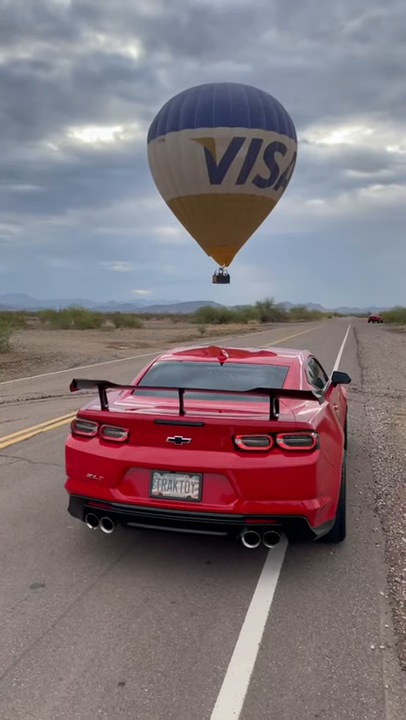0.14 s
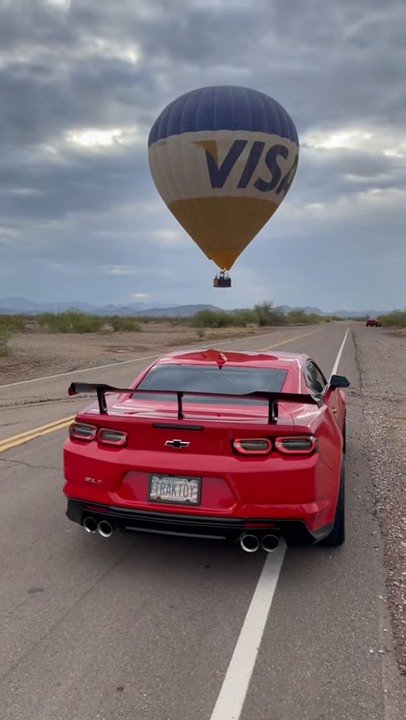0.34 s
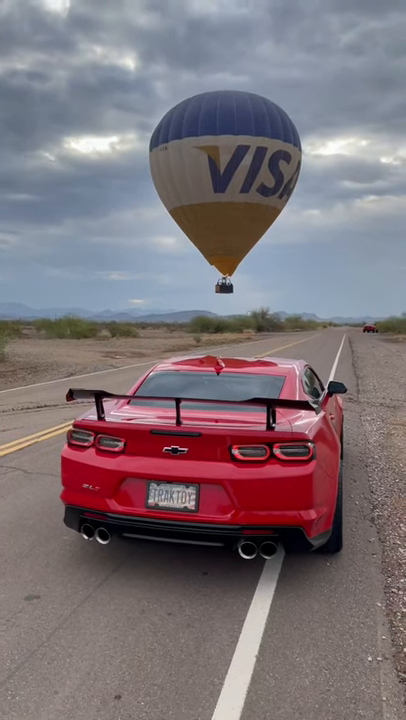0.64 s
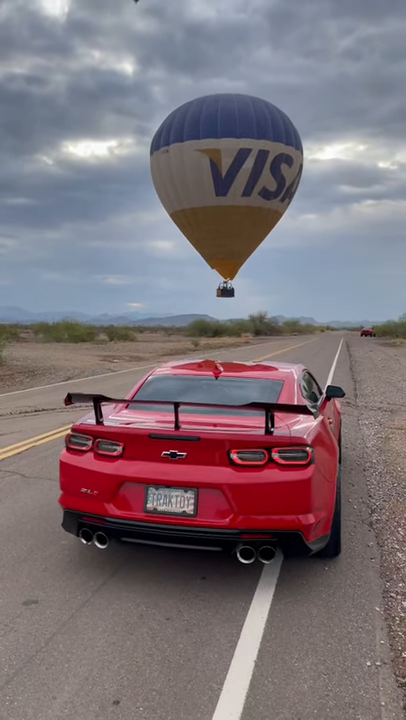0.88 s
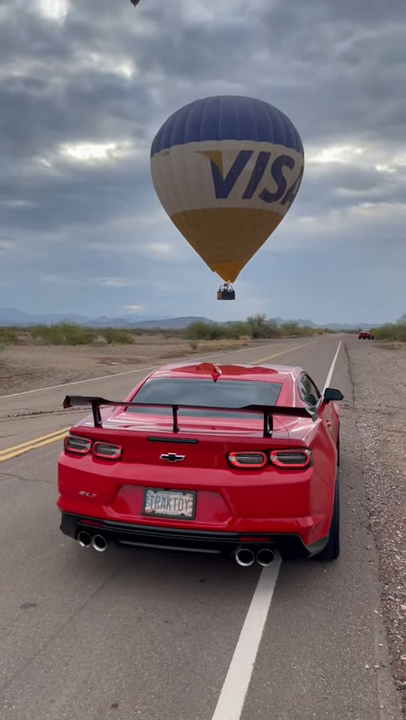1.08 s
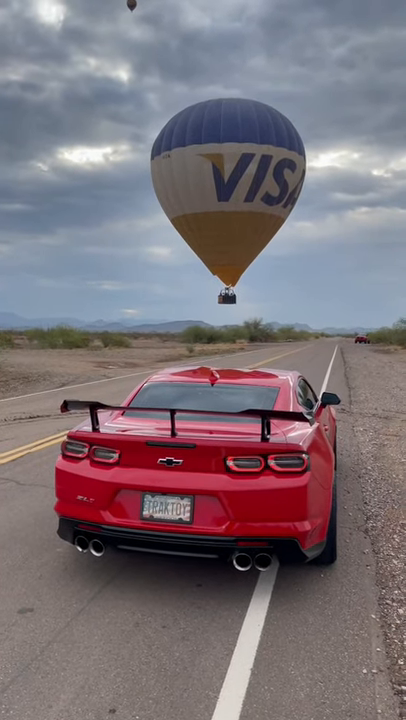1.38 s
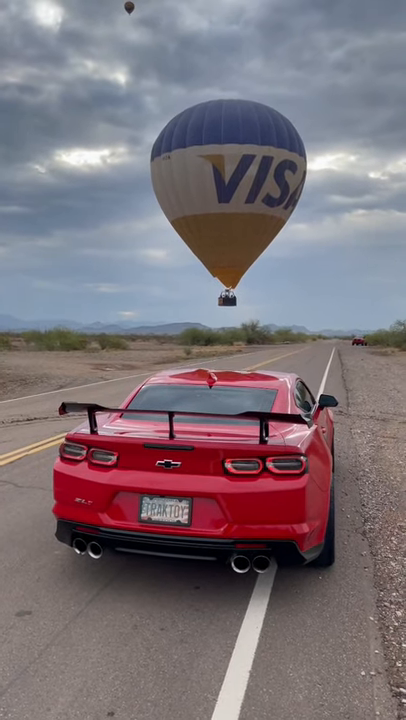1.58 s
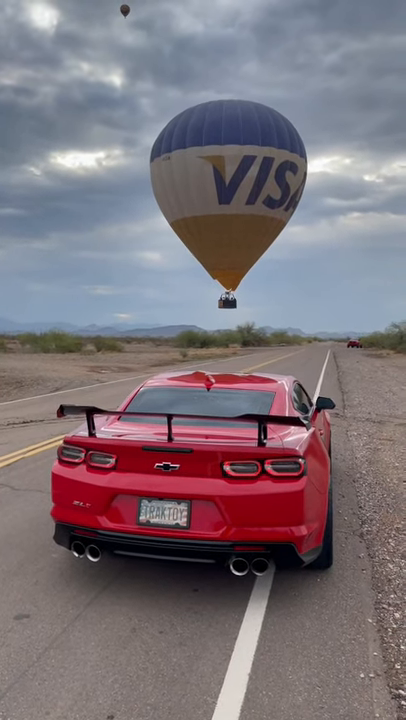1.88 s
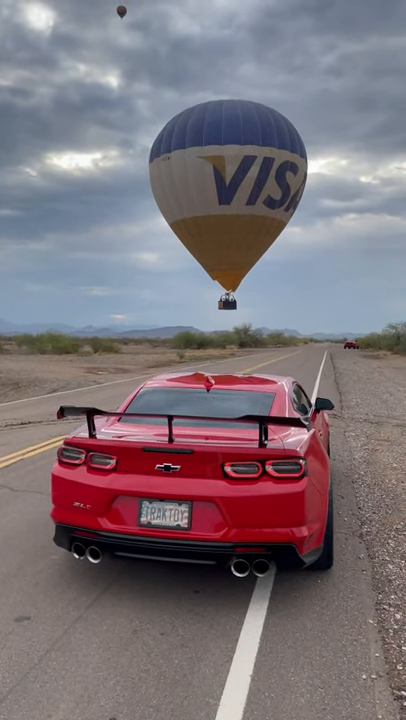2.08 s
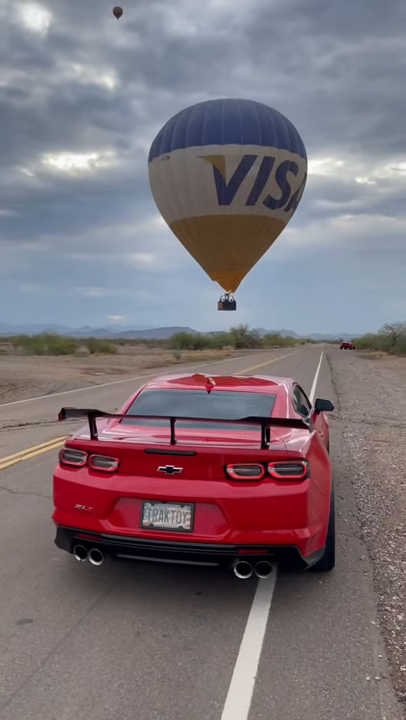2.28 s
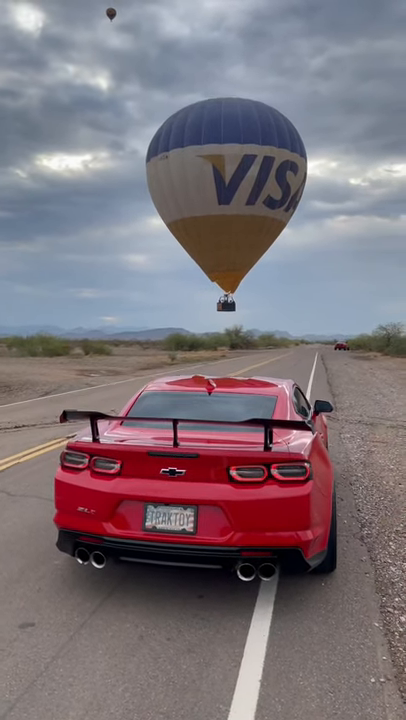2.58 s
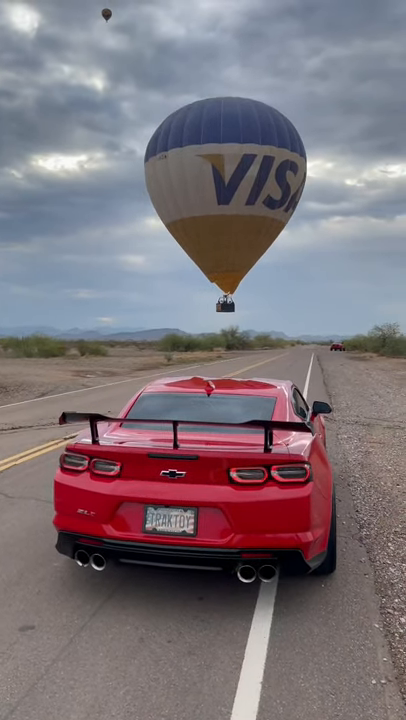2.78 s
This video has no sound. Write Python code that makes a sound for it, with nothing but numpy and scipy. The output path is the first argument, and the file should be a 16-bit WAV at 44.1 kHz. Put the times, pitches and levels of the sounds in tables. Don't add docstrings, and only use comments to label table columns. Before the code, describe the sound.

Low, burbling car idle dominates throughout, with soft fan rush. Close to the handheld stereo phone, shoes scrape and tick on sand, while a far burner hiss and distant tyre noise swell, then fade.

```python
import sys
import numpy as np
from scipy import signal
from scipy.fft import rfft, irfft, next_fast_len
from scipy.io import wavfile
from scipy.ndimage import uniform_filter1d, map_coordinates

SR = 44100
rng = np.random.default_rng(int(sys.argv[2]) if len(sys.argv) > 2 else 0)


def log_audio(samples):
    frames = np.atleast_2d(samples).T
    limited = np.clip(frames, -1, 1)
    pcm = np.round(limited * 32767).astype(np.int16)
    wavfile.write(sys.argv[1], SR, pcm)


def to_linear_factor(level_db):
    exponent = np.asarray(level_db, float) / 20
    return 10 ** exponent


N = 129654
T = np.arange(N) / SR
CYLINDERS = 8


def unit(x):
    return x / np.sqrt(np.mean(x ** 2) + 1e-20)


def along(points, hz):
    f, v = np.transpose(points)
    return np.interp(np.log(hz + 1), np.log(f + 1), v)


def curve(rows):
    return np.interp(T, *np.transpose(rows))


def wobble(rate):
    knots = rng.standard_normal(int(N * rate / SR) + 4)
    return map_coordinates(knots, [T * rate])


def filtered(x, response):
    m = next_fast_len(N + 8192)
    return irfft(rfft(x, m) * response(np.fft.rfftfreq(m, 1 / SR)), m)[..., :N]


def coloured(x, spectrum):
    low, high = spectrum[0][0], spectrum[-1][0]
    return filtered(x, lambda hz: to_linear_factor(along(spectrum, hz)) * (hz > low) * (hz < high))


def rush(spectrum, patchy_db):
    z = signal.stft(rng.standard_normal((2, N)), nperseg=512)[2]
    field = uniform_filter1d(rng.standard_normal(z.shape[1:]), size=8, axis=0)
    field = uniform_filter1d(field, size=8, axis=1)
    noise = signal.istft(z * to_linear_factor(patchy_db * unit(field)), nperseg=512)[1][:, :N]
    return unit(coloured(noise, spectrum))


def evened(spectrum):
    steadiness = .75
    z = signal.stft(rng.standard_normal(N), nperseg=4096)[2]
    noise = signal.istft(z / abs(z) ** steadiness, nperseg=4096)[1][:N]
    return unit(coloured(noise, spectrum))


# time in seconds, rate in firings per second.
SPEED = [
    (0, 38.5),
    (.4, 38.45),
    (.6, 38.25),
    (1.4, 38.45),
    (1.7, 38.2),
    (2.2, 37.95),
    (2.94, 37.95),
]


def engine_cycle():
    cycle_start_s = .2028
    cycle = np.cumsum(curve(SPEED)) / SR / CYLINDERS
    return cycle - cycle[round(cycle_start_s * SR)] + 1


FIRING_ORDER = np.array([8, 16, 24, 32, 40, 48, 56, 64])
FIRING_DB = [-32, -23.5, -31, -41, -47, -45, -36.5, -58]
BANK_ORDER = np.array([10, 12, 18, 20, 22, 28, 30, 52, 60])
BANK_DB = [-39, -39, -46, -40, -45, -42, -43, -50, -46]


def exhaust_tones(cycle):
    stumble_s, stumble_length_s, stumble_cycles = 1.915, .018, .025
    sway_db, sway_turns = .5, .008
    drone_order, drone_turns = 56, .1
    late = stumble_cycles * np.exp(-((T - stumble_s) / stumble_length_s) ** 2)
    flutter = drone_turns * wobble(28)

    def lag(k):
        if k % CYLINDERS and k != BANK_ORDER[0]:
            return -.19 * (k - 19) - k * late
        if k > 21:
            return .5 - .045 * (k - 24)
        return -k * late

    tones = np.zeros(N)
    for k, db in zip([*FIRING_ORDER, *BANK_ORDER], FIRING_DB + BANK_DB):
        level = np.sqrt(2) * to_linear_factor(db + sway_db * wobble(6.07))
        turns = k * cycle + lag(k) + sway_turns * np.sqrt(k) * wobble(7.1)
        if k == drone_order:
            turns = turns + flutter
        tones += level * np.cos(2 * np.pi * turns)
    return tones


# frequency in Hz, gain in dB.
PIPE = [(33, -14), (60, 0), (76, -6), (98, 0), (165, -6.5), (235, -10.5), (295, -11), (312, -17),
        (460, -23)]


def exhaust_puffs(cycle):
    puff_share = .15
    fired = np.diff(np.floor(CYLINDERS * cycle), prepend=0) > 0
    puffs = unit(coloured(fired * rng.standard_normal(N), PIPE))
    return to_linear_factor(-28) * (np.sqrt(puff_share) * puffs + np.sqrt(1 - puff_share) * evened(PIPE))


# frequency in Hz, place in the cycle from 0 to 1,
# peak in dB, 60 dB decay time in seconds, rise time in seconds.
KNOCK = [
    (156, 0.2, -33, 0.13, 0.0046),
    (222, .39, -19.5, 0.083, 0.0043),
    (184.2, .36, -27, 0.17, 0.0064),
    (252.8, .95, -34, .12, 0.0047),
    (280, .7, -32, 0.2, .01),
    (362.6, .36, -33, 0.3, 0.012),
]


def valve_knocks(cycle):
    knocks = np.zeros(N)
    t = T[:SR // 2]
    for hz, place, db, t60, rise in KNOCK:
        struck = np.diff(np.floor(cycle - place), prepend=0) > 0
        struck = struck * to_linear_factor(1.3 * rng.standard_normal(N))
        ring = to_linear_factor(db - 60 * t / t60) * (1 - np.exp(-t / rise)) * np.sin(2 * np.pi * hz * t)
        knocks += signal.fftconvolve(struck, ring)[:N]
    return knocks


def engine():
    cycle = engine_cycle()
    direct = exhaust_tones(cycle) + exhaust_puffs(cycle) + valve_knocks(cycle)
    return np.array([direct, np.roll(direct, 4000)])


# frequency in Hz, level in dB.
BAY = [(330, -11), (420, -5.5), (500, -3.5), (770, 1), (900, -5), (1250, -5.5), (1600, -12.5), (3300, -25)]
# frequency in Hz, level in dB.
WHINE = [(2900, -19.5), (3400, 6.5), (3700, 0), (4100, -0.5), (4700, 0), (5100, -4), (5600, -9),
         (9500, -18)]


def bay():
    air = to_linear_factor(-40 + .22 * wobble(1.6)) * rush(BAY, patchy_db=.52)
    whine = to_linear_factor(-50 - 2.5 * T) * rush(WHINE, patchy_db=2.5)
    return air + whine


# time in seconds, level in dB.
SHUFFLE = [
    (0, -62),
    (.3, -54.5),
    (.75, -52.5),
    (1.05, -51),
    (1.55, -57),
    (1.8, -52.5),
    (2.2, -49.5),
    (2.45, -50.5),
    (2.75, -57),
    (2.94, -63),
]
# frequency in Hz, level in dB.
SAND = [(7500, -26), (8800, -4.5), (9900, 3.5), (10600, -1), (11300, -7), (12300, -26)]


def sand_sizzle():
    return to_linear_factor(curve(SHUFFLE) + 4.5 + 1.2 * wobble(24.7)) * rush(SAND, patchy_db=.8)


# start in seconds, length in seconds, level in dB.
CRUNCH = [(0.03, 0.038, -48.5), (0.155, 0.056, -47), (0.27, 0.078, -45), (0.493, .07, -54),
          (0.81, 0.033, -51), (1, 0.041, -46), (1.342, 0.043, -44), (1.478, .03, -51), (1.703, 0.022, -46),
          (1.895, .03, -46), (1.93, 0.04, -48), (2.348, .03, -50), (2.8, .03, -53)]
# frequency in Hz, level in dB.
GRIT = [(2500, -35), (4500, -4.5), (5500, -15.5), (7500, -16), (9400, -4), (10500, -8), (13000, -51)]


def grit_crunches():
    press = np.zeros(N)
    for start, length, db in CRUNCH:
        rise = np.clip((T - start) / .0021, 0, 1)
        fall = np.clip(3.1 * (1 - (T - start) / length), 0, 1)
        press += to_linear_factor(db) * rise * fall
    size = to_linear_factor(3.2 * wobble(400))
    return press * unit(coloured(rng.standard_normal((2, N)) * size, GRIT))


# time in seconds, bright ring in dB, dull ring in dB.
TICKS = [(.17, -39, -46), (0.287, -42, -52), (.342, -38, -48), (.496, -42, -52), (.517, -42, -52),
         (.552, -41, -54), (.563, -43, -52), (1.347, -42, -36), (1.693, -32, -36), (1.713, -34, -50),
         (1.79, -46, -38), (1.898, -37, -45), (1.917, -42, -35), (1.938, -34, -48), (2.242, -39, -42),
         (2.358, -35, -44), (2.8, -42, -50)]
# centre in Hz, width in Hz.
RINGS = [(9300, 1300), (4700, 600)]


def grain_ticks():
    snaps, t = np.zeros((2, N + 400)), T[:400]
    for start, *db in TICKS:
        decay = to_linear_factor(np.array(db)[:, None] - 60 * t / .021)
        snaps[:, round(start * SR):][:, :400] += decay * rng.standard_normal(400)

    def ring(hz):
        return np.array([1j * hz * w / (c * c - hz * hz + 1j * hz * w) for c, w in RINGS]) ** 2

    bright, dull = 5.5 * filtered(snaps[:, :N], ring)
    return np.array([bright + .4 * dull, np.roll(bright, 30) + 3.5 * dull])


def feet():
    return sand_sizzle() + grit_crunches() + grain_ticks()


# time in seconds, level in dB.
BURNER = [
    (0.0, -58.5),
    (0.77, -52),
    (1.37, -50.5),
    (1.5, -52.5),
    (2.46, -50.5),
    (2.85, -58),
    (2.93, -68),
    (2.94, -56),
]
# frequency in Hz, level in dB.
HISS = [(3000, -21), (4100, -7), (5300, -5.5), (6400, 0), (7300, -5), (8200, -1.5), (10000, -6.5),
        (12300, -37)]


def burner():
    return to_linear_factor(curve(BURNER) + 4 + .95 * wobble(8)) * rush(HISS, patchy_db=.9)


# time in seconds, level in dB.
PASSER = [
    (0.0, -55),
    (0.14, -52),
    (2.19, -45.5),
    (2.68, -46),
    (2.92, -53.5),
    (2.94, -54),
]
# frequency in Hz, level in dB.
HOWL = [(1200, -12), (1700, -5), (2160, 2.5), (2450, -4.5), (2850, -3), (3250, -5.5), (3600, -21),
        (4500, -23)]


def passer():
    return to_linear_factor(curve(PASSER) + 2.5 + .44 * wobble(5.24)) * rush(HOWL, patchy_db=1.28)


# frequency in Hz, coherence from 0 to 1.
ALIKE = [(30, .9997), (60, .99984), (240, .99985), (330, .995), (470, .85), (750, .97), (1100, .72),
         (1500, .985), (2100, .995), (3100, .55), (4750, .82), (5700, .97), (5950, .995), (7000, .83),
         (8150, .88), (8600, .995), (9350, .995), (11000, .72), (12300, .85)]
# frequency in Hz, lead of the left in
LEAD = [(2150, 0), (2800, .8), (3500, 3.5), (4100, 5.5), (4800, 3.25), (5600, 6.1), (6200, 6.35),
        (8480, 9.3), (9400, 9.5), (11800, 12.5)]
# frequency in Hz, left over right in dB.
TILT = [(400, 0), (520, 4), (800, 3), (1080, 7), (1500, .5), (1750, 0), (3000, -1.5), (4700, -2), (5600, 0)]


def scene():
    parts = engine() + bay() + feet() + burner() + passer()

    def ports(hz):
        turn = np.arccos(np.clip(along(ALIKE, hz), -1, 1)) / 2
        lead = np.interp(hz, *np.transpose([(0, .00084)] + LEAD))
        port = to_linear_factor(along(TILT, hz) / 2) * np.exp(.5j * lead)
        left = [port * np.cos(turn), port * np.sin(turn)]
        right = [np.cos(turn) / port, -np.sin(turn) / port]
        return np.array([left, right])

    return filtered(parts, ports).sum(axis=1)


def band_limit(x):
    return signal.sosfilt(signal.butter(12, 12400, fs=SR, output="sos"), x)


def record(dry):
    return band_limit(dry)


dry = scene()
out = record(dry)
log_audio(out)
```